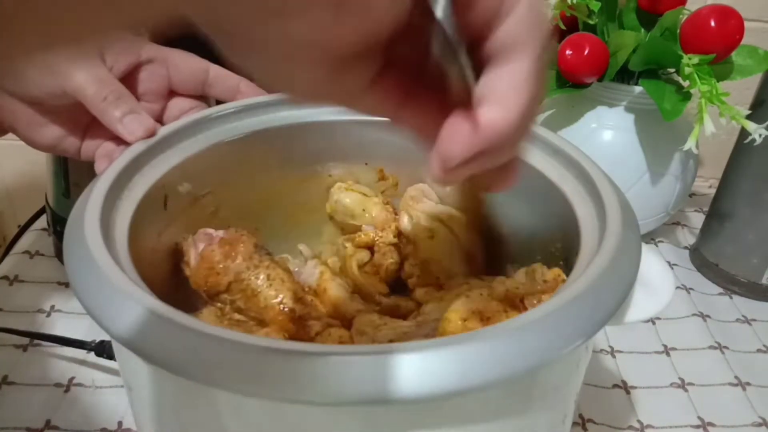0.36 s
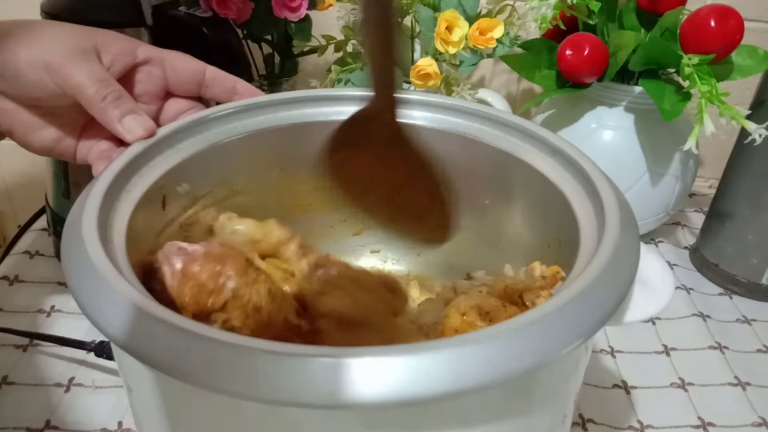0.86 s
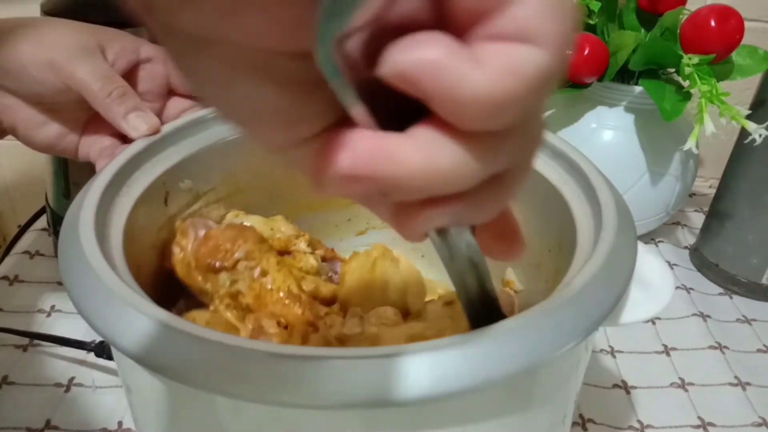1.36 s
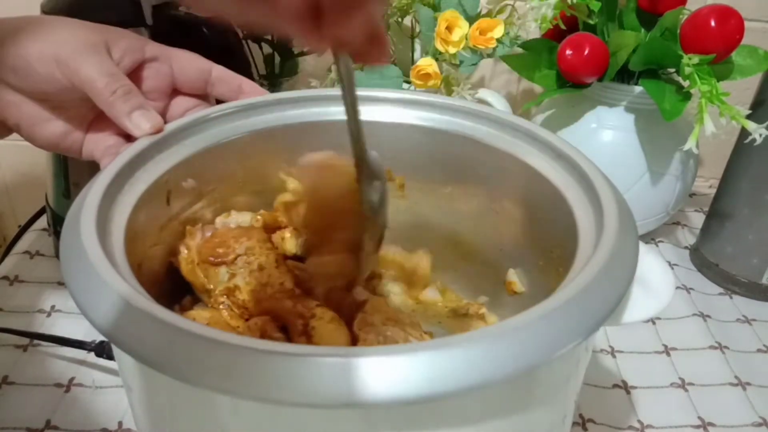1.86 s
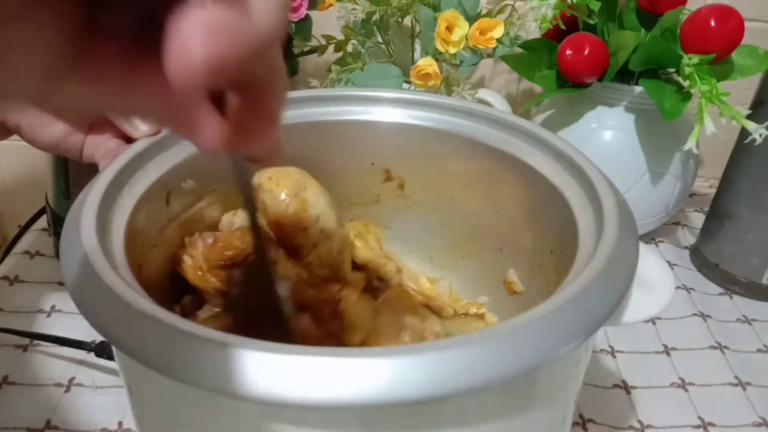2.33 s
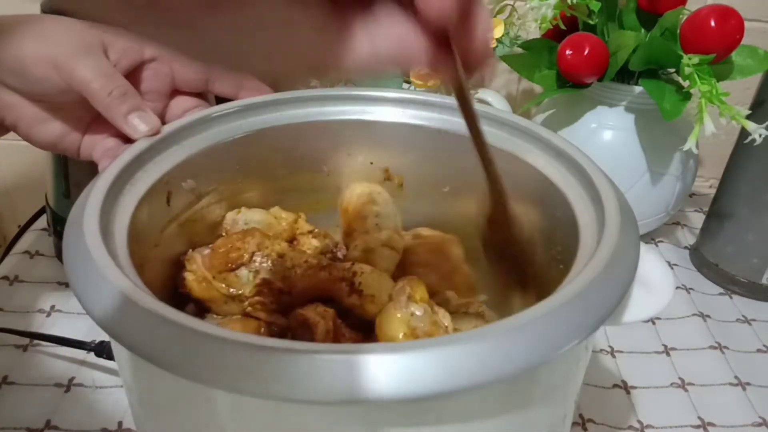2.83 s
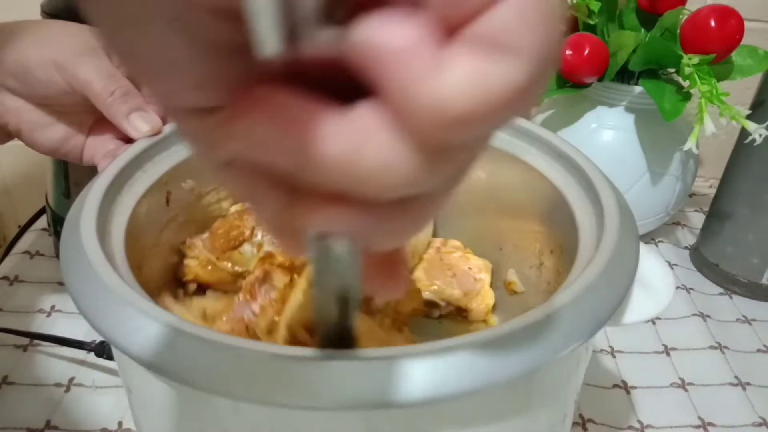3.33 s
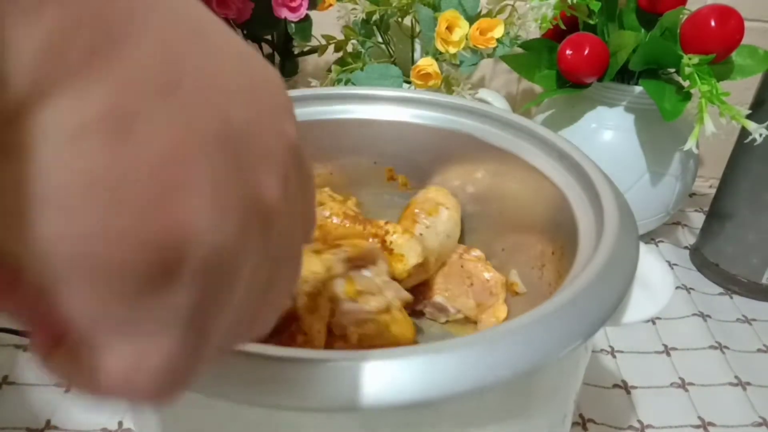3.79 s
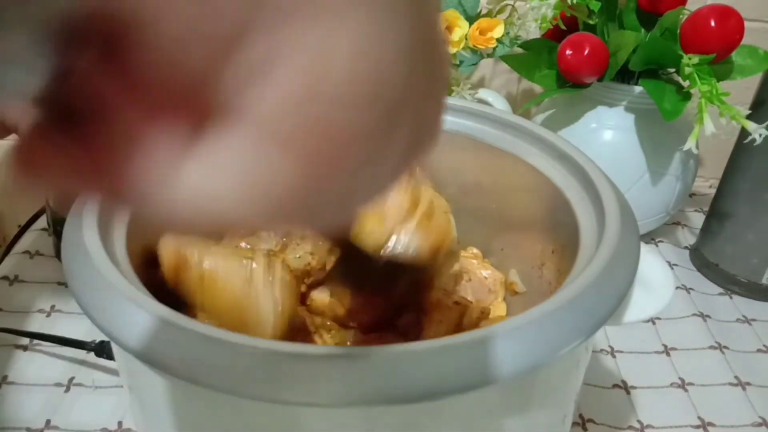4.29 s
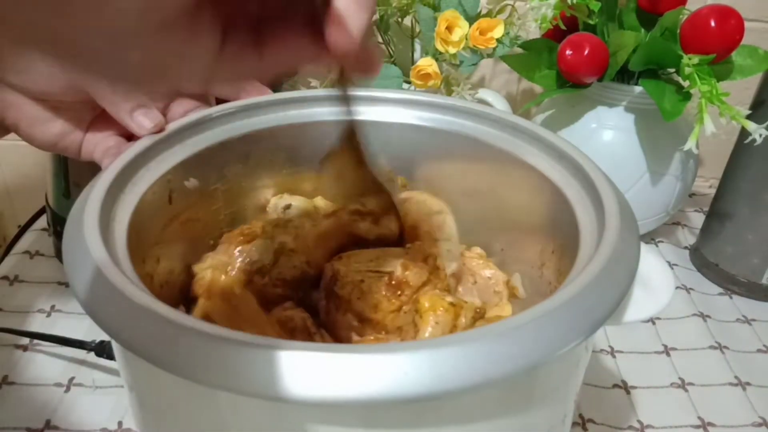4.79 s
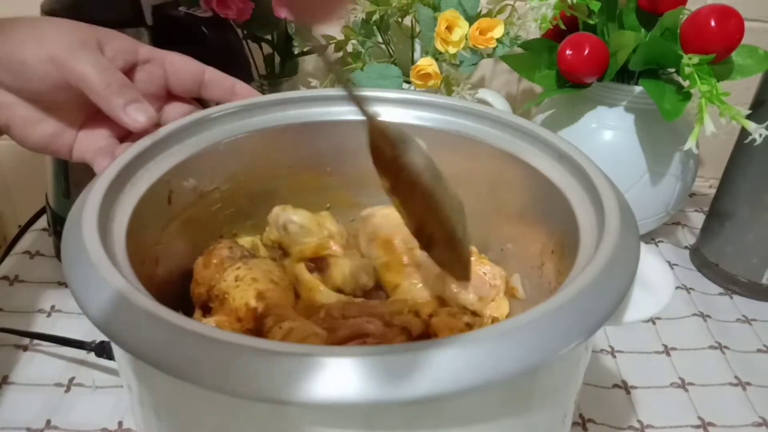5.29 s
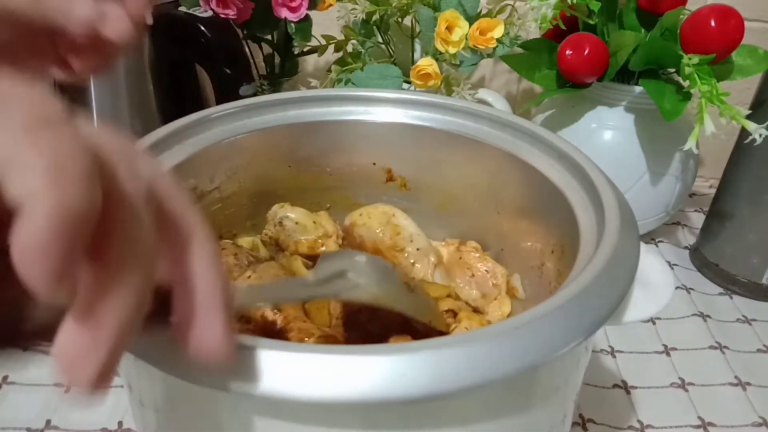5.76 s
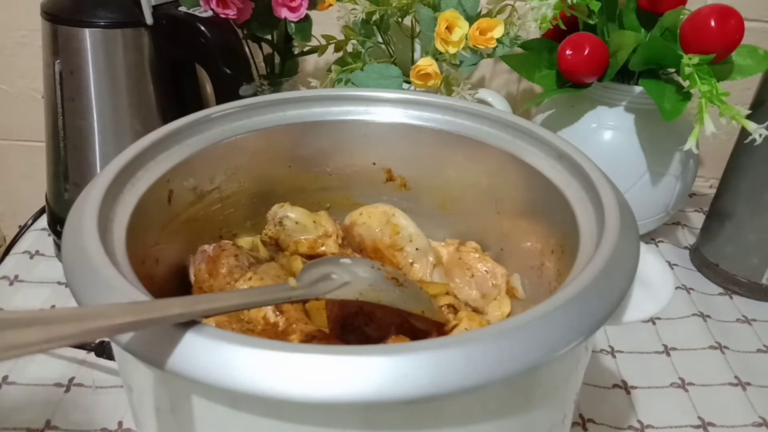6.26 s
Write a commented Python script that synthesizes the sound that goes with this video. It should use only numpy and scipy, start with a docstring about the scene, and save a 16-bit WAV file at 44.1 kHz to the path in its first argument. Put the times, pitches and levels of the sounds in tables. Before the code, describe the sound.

Close kitchen stirring: sharp metallic clinks, gritty short scrapes and dull wet thumps in a thin pot, over faint hiss and a fading low hum.

```python
"""A low motor hum and a faint hiss are heard first, the hum fading; then a metal ladle stirs sticky meat.
It clinks, ticks and scrapes on a thin pot: decaying noise, moving noise bands and resonant modes.
Dull blows ring the loaded pot at low pitches, food tumbles as uneven noise, and the pot groans on the counter.
A kitchen tail of decaying noise and a soft room hiss lie below; the resonances of a small, close
microphone colour it all."""
import sys
import numpy as np
from scipy import signal
from scipy.io import wavfile

SR = 44100
rng = np.random.default_rng(int(sys.argv[2]) if len(sys.argv) > 2 else 0)


def wav_record(signal):
    """Record a signal, one row per channel, as 16-bit PCM in the file named by sys.argv[1]."""
    frames = np.transpose(np.atleast_2d(signal))
    bounded = np.clip(frames, -1, 1)
    # unit amplitude maps onto the largest positive 16-bit level
    quanta = np.round(bounded * 32767).astype(np.int16)
    wavfile.write(sys.argv[1], SR, quanta)


def elevation(decibels):
    """Turn decibel levels (scalar or array-like) into linear amplitude ratios."""
    levels = np.asarray(decibels, float)
    return 10 ** (levels / 20)


N = 281788   # samples


def rms_one(x):
    """Normalisation: scale a signal to unit root-mean-square."""
    return x / np.sqrt(np.mean(x ** 2) + 1e-20)


def in_time(rows):
    """Linear interpolation: the columns after t/s become curves with one value per sample."""
    s, *columns = np.transpose(rows)
    return [np.interp(np.arange(N) / SR, s, c) for c in columns]


def at_hz(points, hz):
    """Spectral interpolation: read a curve on a logarithmic frequency axis."""
    table = np.array(points)
    return np.interp(np.log(hz), np.log(table[:, 0]), table[:, 1])


def drift(rate):
    """Low-passed noise: a slow random modulation of about unit spread; a higher rate in Hz moves faster."""
    hop, settle = 40, 2000   # samples per control step; control steps discarded
    r = np.exp(-2 * hop * np.pi * rate / SR)
    noise = rng.standard_normal(N // hop + settle + 2)
    slow = signal.lfilter([1], [1, -2 * r, r * r], noise)[settle:]
    return np.interp(np.arange(N) / hop, np.arange(len(slow)), rms_one(slow))


def band(x, low_hz, high_hz):
    """Band limitation: a Butterworth band-pass."""
    edges = [low_hz, min(high_hz, .45 * SR)]
    return signal.sosfilt(signal.butter(2, edges, "band", fs=SR, output="sos"), x)


def ring(x, hz, t60):
    """Damped resonance: a unit click starts a sine of initial height 1 that falls 60 dB in t60 seconds."""
    r, w = elevation(-60 / (t60 * SR)), 2 * np.pi * hz / SR
    return signal.lfilter([0, np.sin(w)], [1, -2 * r * np.cos(w), r * r], x + 1e-18)


def grains(length, spread_db):
    """Irregular contact: dense noise impulses whose sizes scatter exponentially in dB."""
    return rng.standard_normal(length) * elevation(spread_db * np.minimum(rng.exponential(1, length), 4))


def banked(source, level_db, low_hz, count, per, patchy_db):
    """Filter-bank synthesis: per bands to the octave, at level_db(Hz) per Hz, each flickering on its own."""
    out, pair = 0, [source(), source()]   # neighbouring bands use different noises
    edges = low_hz * 2 ** (np.arange(count + 1) / per)
    for k, (low, high) in enumerate(zip(edges, edges[1:])):
        gain_db = level_db(np.sqrt(low * high)) + patchy_db * drift(11.3)
        out = out + elevation(gain_db) * band(pair[k % 2], low, high)
    return out


def swells(rows, rise_db_per_s, fall_db_per_s):
    """Exponential envelopes: power of each row on a millisecond grid, with a rise, a hold and a fall."""
    t = np.arange(N * 1000 // SR + 2) / 1000
    start, hold, db = np.array(rows).T[:3, :, None]
    before, after = np.maximum(start - t, 0), np.maximum(t - start - hold, 0)
    return t, elevation(db - rise_db_per_s * before - fall_db_per_s * after) ** 2


def add(track, s, sound, db):
    """Superposition: add a sound at s seconds with its peak at db."""
    i = round(s * SR)
    track[i:i + len(sound)] += (elevation(db) * sound / np.abs(sound).max())[:N - i]


# Ladle on pot wall: [t/s, peak level/dB, brightest f/Hz, broad crack gain/dB, pot bottom level re peak/dB]
WALL_CLINKS = [(0.3195, -28, 6200, 20, -11.5), (0.329, -24.5, 5070, -2, -43), (0.4518, -22.5, 2580, -2, -1),
               (0.683, -31, 5000, -21, -24), (0.799, -29.5, 6060, 28, -25), (1.043, -13.5, 5800, 1, -23.5),
               (1.2148, -28.5, 6260, -19, -10.5), (1.221, -14.5, 7640, -29, -28),
               (2.801, -23, 5170, -34, -23), (2.809, -10.5, 6970, -44, -30.5),
               (2.9447, -18.5, 4870, 32, -14.5), (3.172, -12.5, 2360, 0, -12.5),
               (3.399, -32, 4900, 11, -12.5), (3.5953, -16, 2670, 2.5, -17.5),
               (3.785, -17.5, 6340, 15, -28), (3.9293, -38.5, 4670, -20, -13), (4.016, -33, 2060, 6, -16),
               (3.961, -31.5, 5270, -25, -21), (4.1232, -39, 1800, -5, -17), (4.7065, -13, 2960, 10, -16.5),
               (4.7237, -13, 6850, 6, -44), (4.737, -17, 4240, -16, -20.5), (4.91, -25, 4740, -10, -32.5),
               (5.5383, -38, 7170, -2, -12.5), (5.783, -6.5, 5100, -10, -22), (5.7874, -9.5, 5720, 1, -16),
               (5.7977, -8.5, 5900, 19, -24)]


def clinks():
    """Impact and rattle: a tick with short dying chatter drives a bright band, a crack and the pot bottom."""
    out, t = np.zeros(N), np.arange(SR // 8) / SR
    chatter_s = 0.0083   # time constant of the rattle
    for s, db, hz, crack_db, bottom_db in WALL_CLINKS:
        chatter = grains(len(t), spread_db=3.0) * np.exp(-t / chatter_s)
        chatter[0] = 7.3   # the first touch
        bright = band(chatter, hz / 1.32, hz * 1.35)
        crack = band(chatter, 2440, 8300) + elevation(-2.0) * band(chatter, 10600, 12630)
        add(out, s, bright + elevation(crack_db) * crack, db)
        add(out, s, band(chatter, 1088, 1310), db + bottom_db)
    return out


# Light dry ticks of the ladle tip: [t/s, peak level/dB, centre f/Hz]
TIP_TICKS = [(1.497, -22.5, 3650), (1.557, -34.5, 5600), (1.612, -30.5, 4300), (1.8227, -44, 3080),
             (2.201, -38, 7220), (2.2774, -43, 3500), (4.102, -29, 8100), (5.1925, -30.5, 9150)]


def ticks():
    """Short impact: band-limited grains decay with a time constant of 2 ms."""
    out, t = np.zeros(N), np.arange(SR // 40) / SR
    for s, db, hz in TIP_TICKS:
        tick = grains(len(t), spread_db=2.0) * np.exp(-t / 0.002)
        add(out, s, band(tick, hz / 1.8, hz * 1.6), db)
    return out


# Hard knocks of a bone on the pot floor: [t/s, peak level/dB]
BONE_KNOCKS = [(0.4518, -13.5), (0.4551, -14), (4.126, -38)]


def knocks():
    """Contact pulse: half a sine as long as the contact, then band-limited."""
    out, t = np.zeros(N), np.arange(SR // 40) / SR
    contact_s = 0.00072
    for s, db in BONE_KNOCKS:
        add(out, s, band(np.sin(np.pi * np.minimum(t / contact_s, 1)), 210, 5900), db)
    return out


# Drags of the ladle edge on the wall; the last row is a faint swish after the ladle is let go:
# [start t/s, hold t/s, level/dB, centre f/Hz, surrounding hiss level/dB]
DRAGS_AND_SWISH = [(0.39, 0.067, -41.5, 6560, -5.5), (0.444, 0.026, -50, 2060, -1),
                   (1.06, 0.054, -50.5, 6170, 2.5), (1.235, 0.031, -44.5, 6500, -3),
                   (1.33, 0.1, -48, 5430, -0.5), (1.444, 0.088, -46, 2180, -12),
                   (1.467, 0.0073, -37.5, 5670, -7), (1.581, 0.078, -49, 6500, -8.5),
                   (2.255, 0.058, -58, 2880, 3), (2.438, 0.12, -56, 3460, -11),
                   (2.827, 0.16, -48, 6700, -7.5), (3.014, 0.099, -49.5, 5200, -4),
                   (3.118, 0.037, -45, 2600, 0), (3.203, 0.038, -38, 5060, -4.5),
                   (3.37, 0.048, -42, 5170, -5), (3.622, 0.021, -46.5, 5600, -24),
                   (3.948, 0.069, -47, 5100, -11.5), (4.242, 0.091, -52.5, 4460, -11.5),
                   (4.742, 0.042, -41.5, 3870, -6), (4.748, 0.014, -47, 2400, -8),
                   (4.916, 0.054, -44.5, 2870, -6.5), (5.551, 0.025, -46.5, 5080, -1.5),
                   (6.238, 0.1, -48.5, 6240, -7)]
# Faint hiss under and between the drags, which stays when the ladle rests: [t/s, level/dB, centre f/Hz]
FAINT_HISS = [(0, -54.5, 4270), (.3, -54, 3900), (.7, -52, 6000), (1.62, -73, 5200), (1.75, -67.5, 7200),
              (2.75, -63, 3870), (3.8, -60.5, 6650), (4.1, -56, 6300), (4.5, -60.5, 6700),
              (5.2, -55.5, 7100), (5.7, -54, 5300), (6.39, -54.5, 4660)]


def scrape_controls():
    """Power weighting: gain, centre in octaves and hiss in dB; the loudest row dominates the last two."""
    now, rows = np.arange(N) / SR, np.array(DRAGS_AND_SWISH)
    faint_db, faint_hz = in_time(FAINT_HISS)
    faint, faint_skirt_db = elevation(2 * faint_db), -5
    t, drags = swells(DRAGS_AND_SWISH, rise_db_per_s=282, fall_db_per_s=214)
    power = faint + np.interp(now, t, drags.sum(axis=0))
    centre = (faint * np.log2(faint_hz) + np.interp(now, t, np.log2(rows[:, 3]) @ drags)) / power
    hiss_db = (faint * faint_skirt_db + np.interp(now, t, rows[:, 4] @ drags)) / power
    return np.sqrt(power), centre, hiss_db


def grit_pings(centre):
    """Random excitation: about 1800 catches a second, as of an edge on grit, each ping briefly."""
    caught = np.flatnonzero(rng.random(N) < 1800 / SR)
    dealt, sizes, pings = rng.integers(0, 16, N), grains(N, spread_db=.7), 0
    for k, hz in enumerate(np.geomspace(1500, 8500, 16)):
        kicks = np.zeros(N)
        nearness = elevation(-14.0 * np.abs(np.log2(hz) - centre[caught]))   # dB per octave
        kicks[caught] = (dealt == k)[caught] * sizes[caught] * nearness
        pings = pings + ring(kicks, hz, 0.038)
    return pings


def scrape():
    """Friction noise: drags, swish and faint hiss rasp as noise and pings around a moving spectral centre."""
    gain, centre, hiss_db = scrape_controls()

    def hump(hz):
        """Spectral slope: a steep peak at the centre above a broad skirt."""
        octaves = np.abs(np.log2(hz) - centre)
        return np.maximum(-32 * octaves, hiss_db - 1.86 * octaves)

    hiss = banked(lambda: grains(N, spread_db=2.8), hump, 1000, count=11, per=3, patchy_db=2.5)
    rough = rms_one(hiss * elevation(3.54 * drift(20)))
    return gain * rms_one(rough + elevation(-5) * rms_one(grit_pings(centre)))


# The ladle edge sings in one narrow band while it slips: [start t/s, length t/s, peak level/dB, centre f/Hz]
EDGE_SLIPS = [(0.992, 0.027, -43, 6340), (1.41, 0.08, -38, 2160), (2.951, 0.11, -42.5, 4470),
              (3.19, 0.096, -38, 5700), (3.265, 0.022, -41, 4130), (3.931, 0.063, -45, 4540),
              (3.974, 0.025, -36.5, 4580), (4.018, 0.018, -46, 3840), (4.025, 0.02, -39, 5700)]


def slips():
    """Narrow-band friction: each slip swells as the square root of time and stops within 2.3 ms."""
    out, ratio = np.zeros(N), 1.04   # band edges as a ratio to the centre
    for s, length, db, hz in EDGE_SLIPS:
        u = np.arange(round(length * SR)) / SR
        swell = np.sqrt(u / length) * np.minimum((length - u) / 0.0023, 1)
        add(out, s, band(grains(len(u), spread_db=1.5), hz / ratio, hz * ratio) * swell, db)
    return out


# Modes of pot and ladle when nothing holds them: [f/Hz, level/dB, t60/s]
FREE_MODES = [(1061, -12, .55), (1147, -12, .26), (1700, -16, .32), (2225, -14, .24), (2460, -13, .16),
              (2751, -13, .25), (3133, -9, .16), (3629, -10, .4), (4105, -8, .25), (4920, -9, .16),
              (5378, -13, .2), (5630, -6, .12), (5740, -5, .14), (5993, -14, .42), (6945, -14, .22),
              (7391, -15, .25)]
# Touches that ring on freely: [t/s, level/dB, lowest free f/Hz, highest free f/Hz]
FREE_TOUCHES = [(4.0155, -35, 1500, 2400), (4.709, -27, 1500, 2600), (5.785, -27, 500, 12000)]


def pot(contact, rasp):
    """Modal radiation: contact and rasp sound directly and through modes, free only in a slack or open hand."""
    out = contact + rasp
    held = elevation(-67) * contact + elevation(-43.5) * rasp
    held_share = 0.74   # share of the ring time left while a hand grips the ladle
    for hz, db, t60 in FREE_MODES:
        free = np.zeros(N)
        for s, blow_db, low_hz, top_hz in FREE_TOUCHES:
            free[round(s * SR)] = elevation(blow_db) * (low_hz < hz < top_hz)
        out += elevation(db) * (ring(held, hz, t60 * held_share) + ring(free, hz, t60))
    go = round(5.76 * SR)   # the hand releases the ladle
    t = np.arange(N - go) / SR
    shimmer = rng.standard_normal(N - go) * elevation(-60 * t / 0.44)   # the countless weak modes of the thin wall
    out[go:] += elevation(-36.5) * band(signal.fftconvolve(contact[go:], shimmer)[:N - go], 2040, 14000)
    return out


# Dull blows through the food: [t/s, peak level/dB, f/Hz, t60/s, pot-floor ring level re peak/dB]
FOOD_BLOWS = [(0.323, -32.5, 360, 0.11, -14.5), (0.451, -24.5, 291, 0.033, -4), (0.479, -37, 280, 0.18, -8),
              (1.041, -28.5, 370, 0.029, -13.5), (1.213, -34, 240, 0.027, -6), (1.269, -40, 568, 0.1, -17),
              (1.477, -29.5, 172, 0.058, -11), (1.561, -33, 167, 0.05, -28),
              (2.804, -28.5, 364, 0.062, -7.5), (2.943, -26, 359, 0.032, -6.5),
              (2.947, -28, 125, 0.091, -32), (3.172, -30.5, 228, 0.082, -9), (3.59, -42, 184, 0.08, 1.5),
              (4.125, -38.5, 907, 0.021, -7), (4.705, -29, 370, 0.052, -32),
              (4.784, -24.5, 260, 0.066, -10.5), (5.785, -37.5, 306, 0.14, -10),
              (5.801, -41.5, 421, 0.21, -10)]
# Pot-floor modes, varied at each blow: [f/Hz, mean relative level/dB, t60/s]
FLOOR_MODES = [(395, -27, 0.083), (584.6, 9, 0.063), (665.5, -1.5, 0.14), (780, -34, 0.015)]


def thumps():
    """Mass loading: a soft push rings the loaded pot at a low pitch, with pot floor and counter below."""
    out, t = np.zeros(N), np.arange(SR // 4) / SR
    for s, db, hz, t60, floor_db in FOOD_BLOWS:
        squash = 0.25 * rng.standard_normal(len(t)) * t * np.exp(-t / 0.0049)   # the food gives way unevenly
        push = band(band(t * np.exp(-t / 0.00043) + squash, 143, 1020), 73, 4200)
        counter = elevation(-13.0) * ring(push, 131, 0.14)
        add(out, s, ring(push, hz, np.clip(t60, .02, .5)) + counter + elevation(15.5) * push, db)
        floor = sum(elevation(d + rng.normal(0, 3)) * ring(push, f, r) for f, d, r in FLOOR_MODES)
        add(out, s, floor, db + floor_db)
    return out


# Heaps of food falling over: [start t/s, hold t/s, level/dB]
FOOD_FALLS = [(.48, 0.054, -43.5), (1.08, 0.013, -48), (1.24, 0.022, -43.5), (1.47, 0.033, -45.5),
              (3.06, 0.078, -45), (3.2, 0.11, -44.5), (3.44, 0.0094, -53), (3.61, 0.014, -49),
              (3.94, 0.041, -54.5), (4.03, 0.011, -51), (4.74, 0.13, -52.5)]
# Spectrum of the moving food: [f/Hz, relative level per Hz/dB]
FOOD_SPECTRUM = [(80, -18), (140, 7.5), (300, 3.5), (600, 1), (1200, -5.5), (2000, -10)]


def food():
    """Granular noise: many uneven contacts slide softly and swell as the food tumbles."""
    t, falls = swells(FOOD_FALLS, rise_db_per_s=311, fall_db_per_s=159)
    rest_db = -62
    gain = np.sqrt(elevation(2 * rest_db) + np.interp(np.arange(N) / SR, t, falls.sum(axis=0)))
    noise = banked(lambda: grains(N, spread_db=7.0), lambda hz: at_hz(FOOD_SPECTRUM, hz),
                   64.8, count=10, per=1.885, patchy_db=4.5)
    return gain * rms_one(noise)


# The pot shifts on the counter: [t/s, mean f/Hz, mean level/dB]
POT_SHIFT = [(3.4, 179, -58), (3.463, 218, -55), (3.545, 156.9, -57), (3.614, 190.3, -49),
             (3.652, 206, -50), (3.68, 191, -63)]


def groan():
    """Frequency and amplitude modulation: a low rough tone slides while the pot shifts."""
    hz, db = in_time(POT_SHIFT)
    now = np.arange(N) / SR
    fade = np.clip(np.minimum(now - POT_SHIFT[0][0], POT_SHIFT[-1][0] - now) / 0.03, 0, 1)
    phase = 2 * np.pi * np.cumsum(hz * (1 + 0.11 * drift(24))) / SR
    return np.sqrt(2) * fade * elevation(db + 5.0 * drift(48)) * np.sin(phase)


# Fading motor tone: [t/s, mean level of the fundamental/dB]
MOTOR_FADE = [(0, -48), (.8, -50), (1.4, -53), (1.64, -52), (1.75, -64), (2.3, -66), (2.7, -71), (4.6, -77),
              (6.39, -77)]


def hum():
    """Harmonic synthesis: a wavering low motor tone with its octave."""
    mean_hz, octave_db = 60.5, -16
    turn = 2 * np.pi * np.cumsum(mean_hz * (1 + .03 * drift(6))) / SR
    tone = np.sin(turn) + elevation(octave_db + 2.0 * drift(1)) * np.sin(2 * turn)
    return np.sqrt(2) * elevation(in_time(MOTOR_FADE)[0] + 1.3 * drift(12)) * tone


# Reverberation time of the kitchen: [f/Hz, t60/s]
KITCHEN_DECAY = [(150, 0.37), (1000, 0.37), (4000, 0.24), (12000, 0.26)]


def kitchen(x):
    """Diffuse reverberation: dense reflections build up over 21 ms and die band by band."""
    t, edges = np.arange(SR * 3 // 4) / SR, 90 * 2. ** np.arange(9)
    tail = 0
    for low, high in zip(edges, edges[1:]):
        noise = band(rng.standard_normal(len(t)), low, high)
        tail = tail + noise * elevation(-60 * t / at_hz(KITCHEN_DECAY, low * 1.4))
    tail *= np.minimum(t / 0.021, 1)
    return signal.fftconvolve(x, tail / np.sqrt(np.sum(tail ** 2)))[:N]


# Spectrum of the room hiss: [f/Hz, relative level per Hz/dB]
AIR_SPECTRUM = [(25, 9), (45, 0), (130, 32.5), (400, -68), (900, 14.5), (2000, 1), (5000, 7), (16000, 1.5)]


def room_air():
    """Stationary noise: a softly flickering hiss with a shaped spectrum, at -59.5 dB rms."""
    air = banked(lambda: rng.standard_normal(N), lambda hz: at_hz(AIR_SPECTRUM, hz),
                 22, count=20, per=2, patchy_db=1.0)
    return elevation(-59.5) * rms_one(air)


def scene():
    """Superposition: pot and food, their echo in the kitchen, hum and room air."""
    near = pot(clinks(), scrape()) + ticks() + slips() + knocks() + food() + groan()
    low = thumps()
    echo = kitchen(near + elevation(-1.5) * low)   # the thumps echo slightly less
    return (near + low + elevation(-10) * echo + hum() + room_air())[None]


# Resonances and notches of the microphone and its housing: [f/Hz, width f/Hz, level/dB]
MICROPHONE_PEAKS = [(1226.4, 115, 16), (6420, 1620, 5.5), (6620, 420, -13), (7506, 2770, 11.5),
                    (12190, 9640, -21), (15140, 570, 15)]


def microphone(x):
    """Resonant coloration: second-order peaks and notches, then a steep top cut."""
    for hz, width_hz, db in MICROPHONE_PEAKS:
        w, a = 2 * np.pi * hz / SR, elevation(db / 2)
        k = np.tan(np.pi * width_hz / SR)
        x = signal.lfilter([1 + k * a, -2 * np.cos(w), 1 - k * a], [1 + k / a, -2 * np.cos(w), 1 - k / a], x)
    return signal.sosfilt(signal.cheby2(12, 45, 16400, fs=SR, output="sos"), x)


def band_limit(x):
    """A steep low-pass at the top of the band."""
    return signal.sosfilt(signal.butter(12, 16780, fs=SR, output="sos"), x)


def record(dry):
    """Transduction: the microphone colours the sound of the scene."""
    mix = microphone(dry)
    return band_limit(mix)


dry = scene()
out = record(dry)
wav_record(out)
```